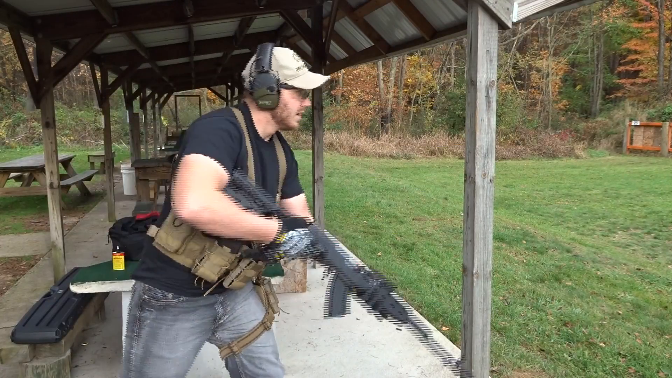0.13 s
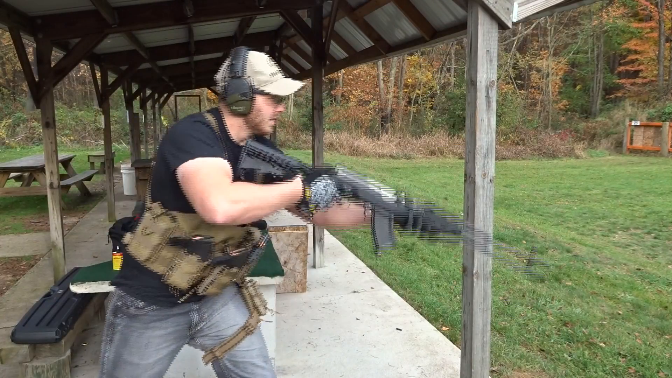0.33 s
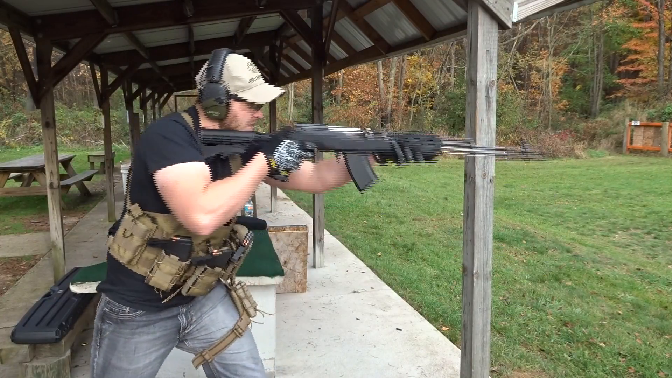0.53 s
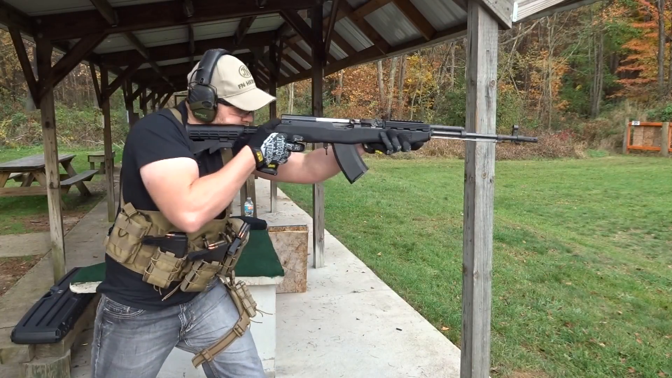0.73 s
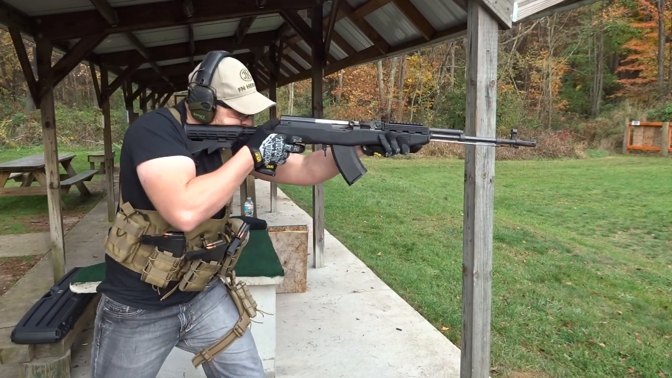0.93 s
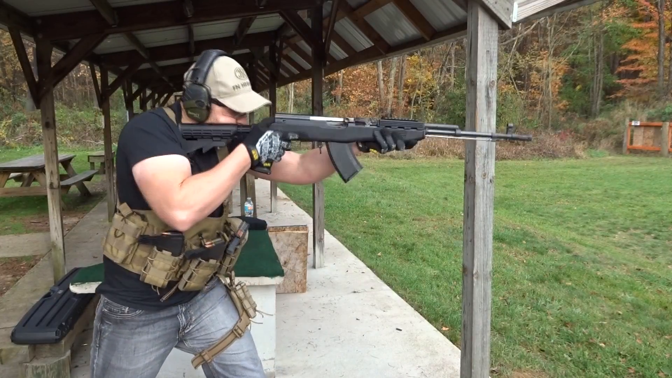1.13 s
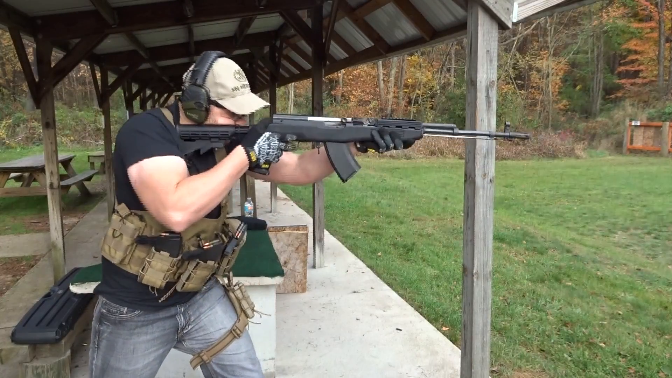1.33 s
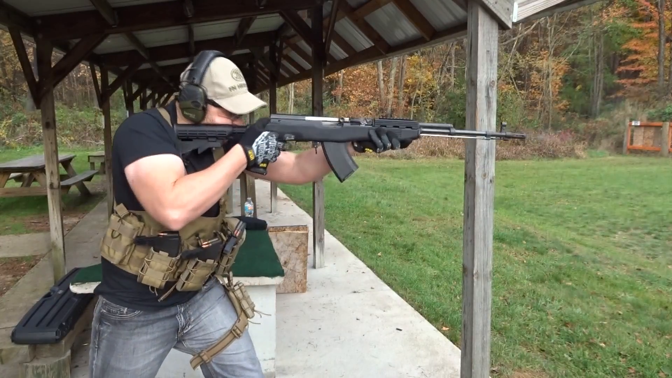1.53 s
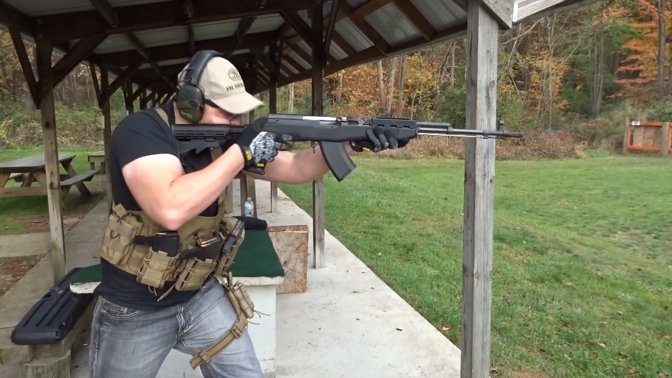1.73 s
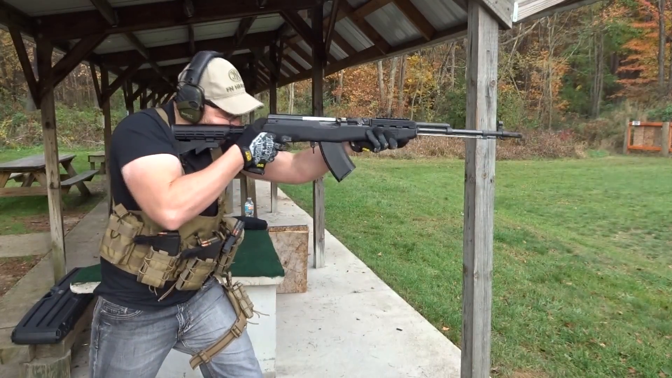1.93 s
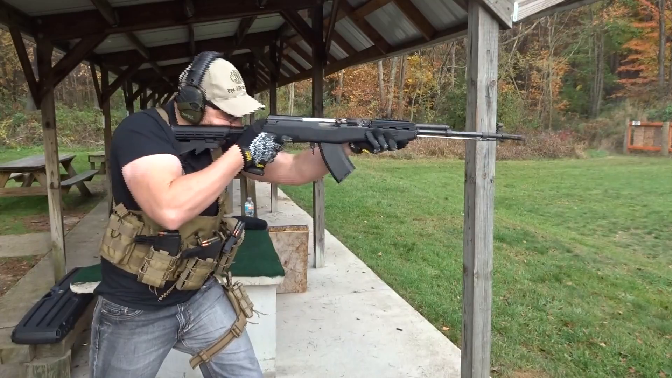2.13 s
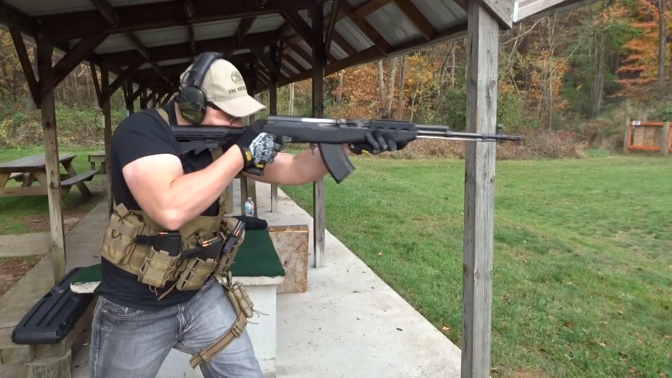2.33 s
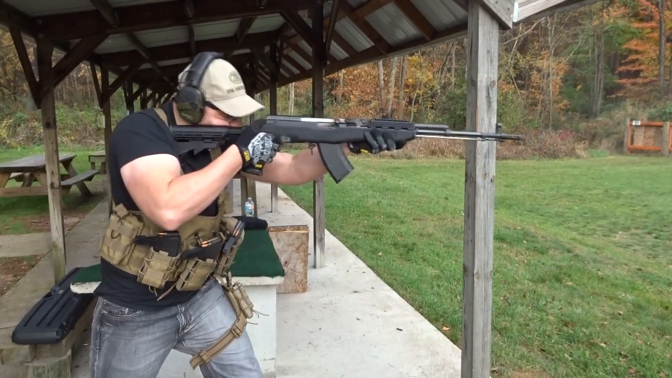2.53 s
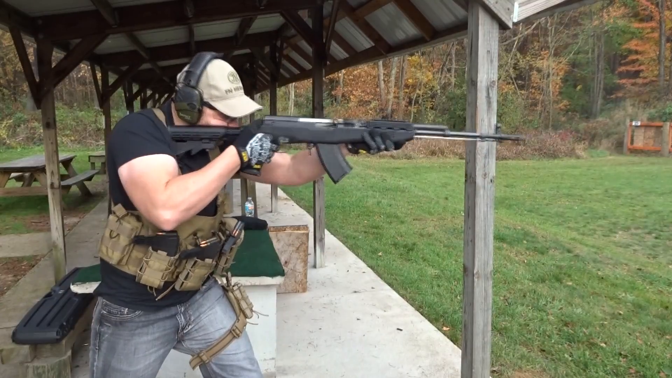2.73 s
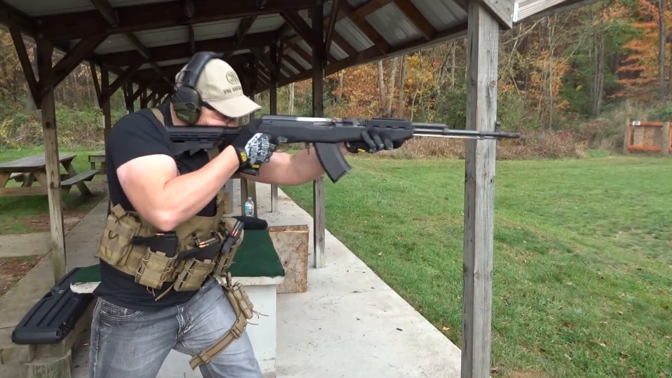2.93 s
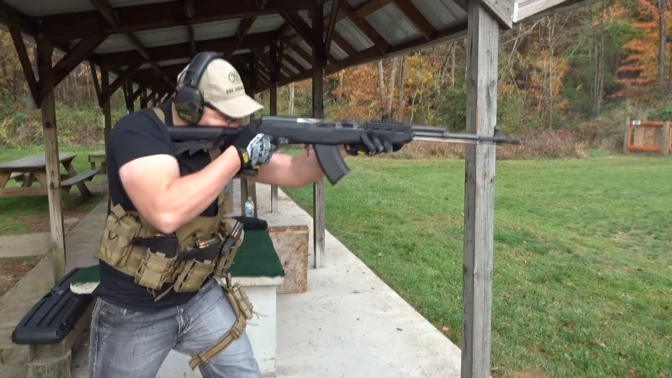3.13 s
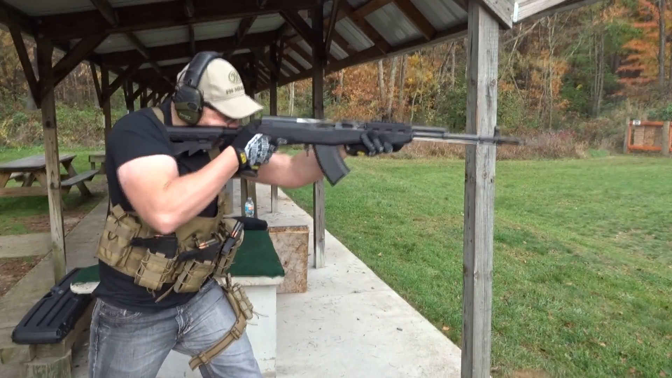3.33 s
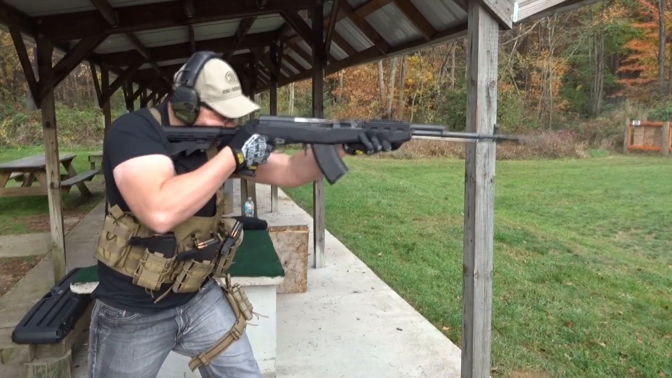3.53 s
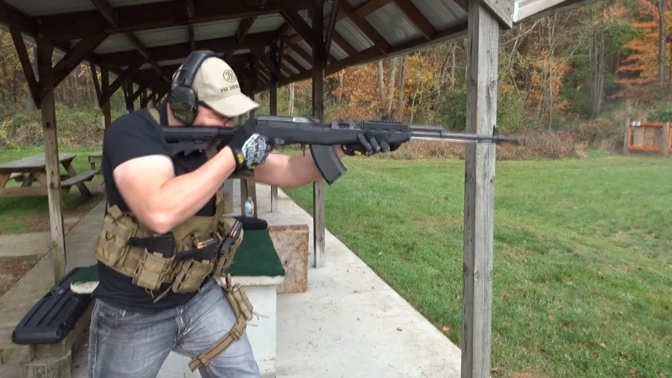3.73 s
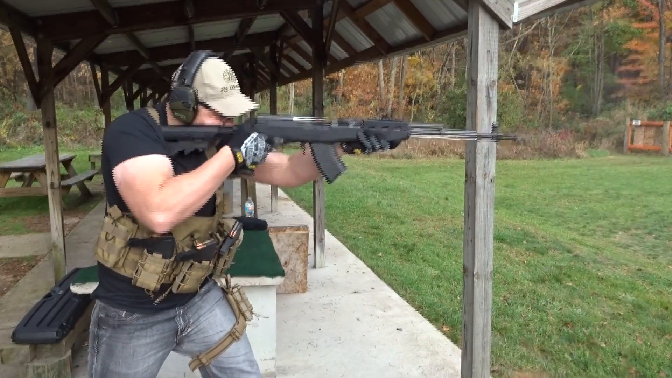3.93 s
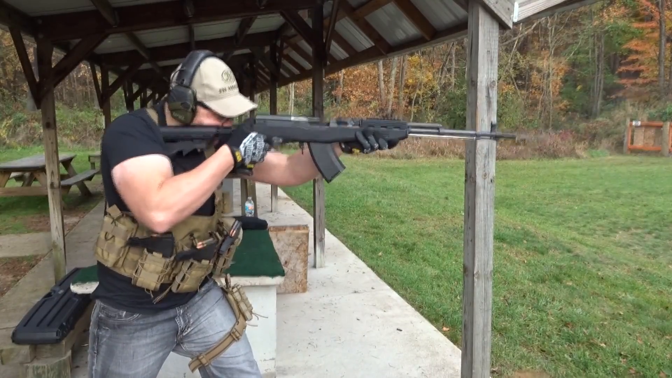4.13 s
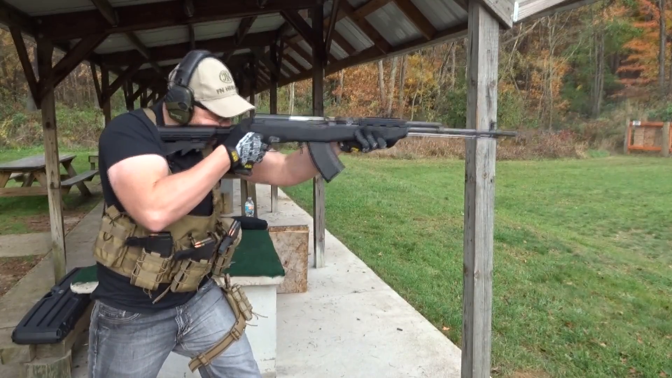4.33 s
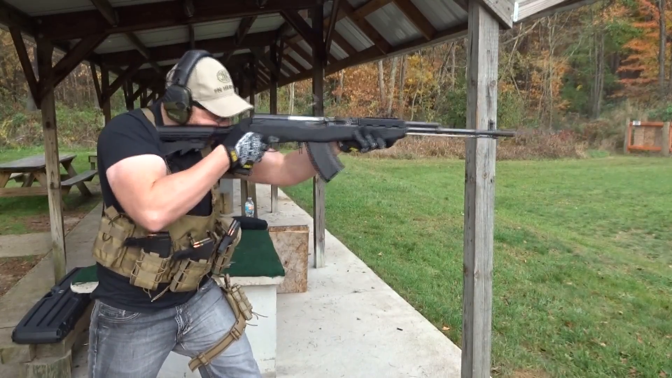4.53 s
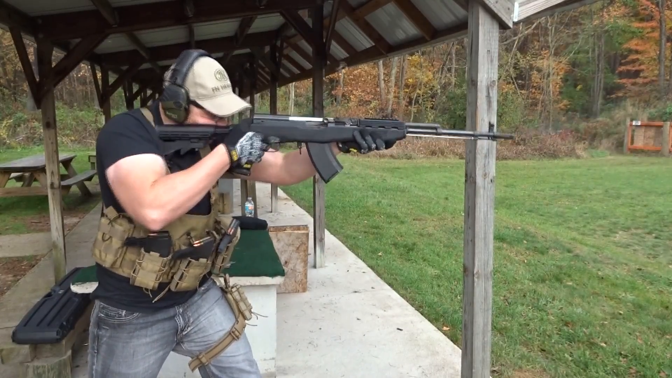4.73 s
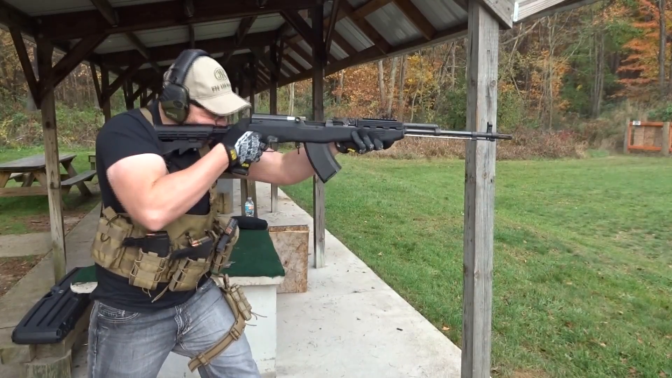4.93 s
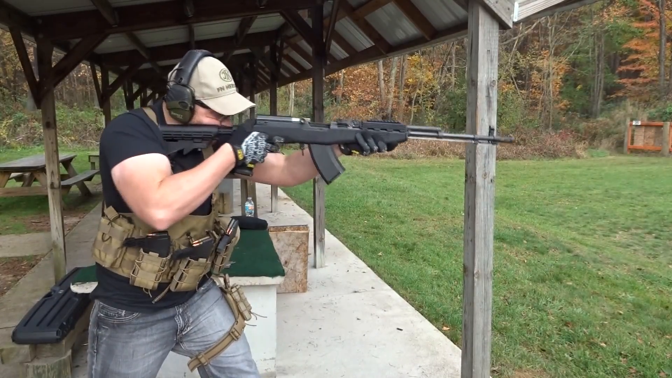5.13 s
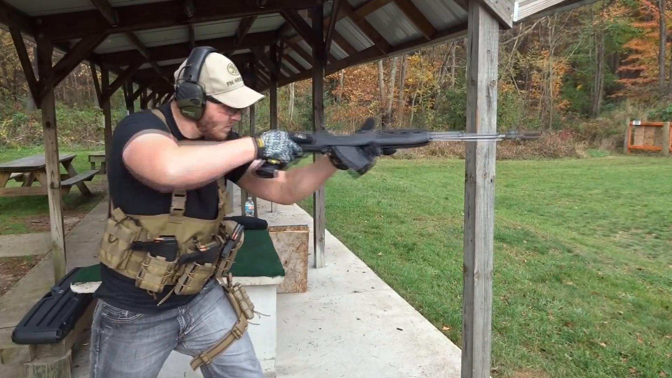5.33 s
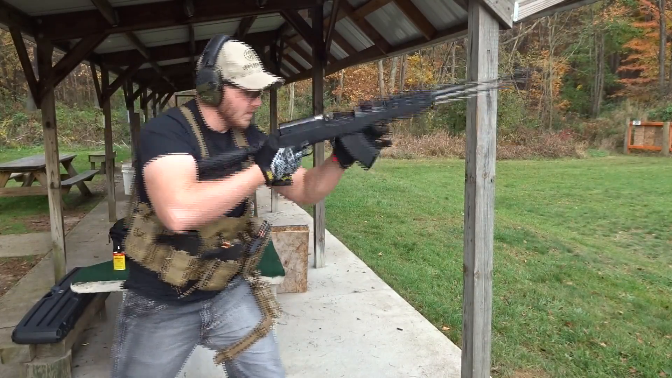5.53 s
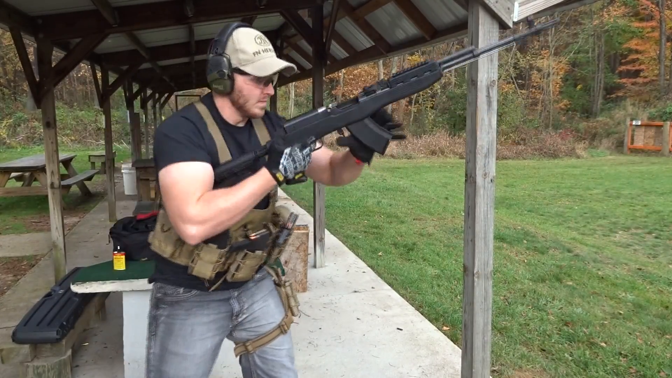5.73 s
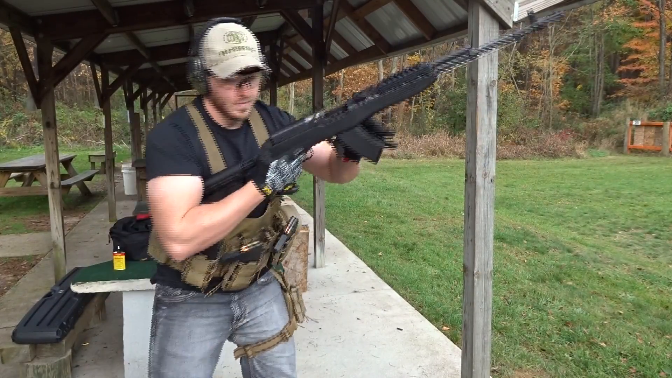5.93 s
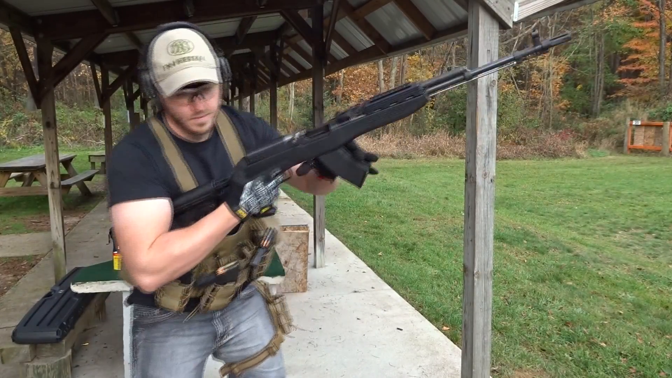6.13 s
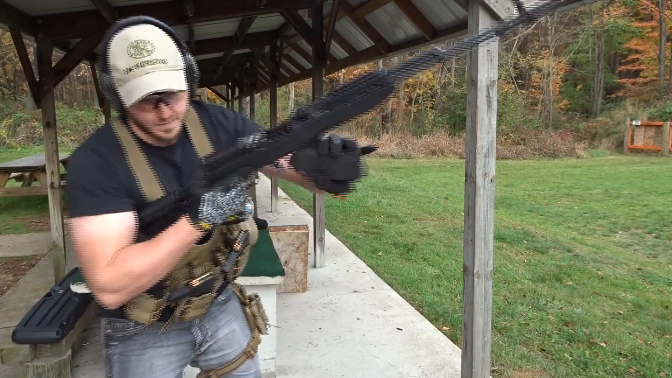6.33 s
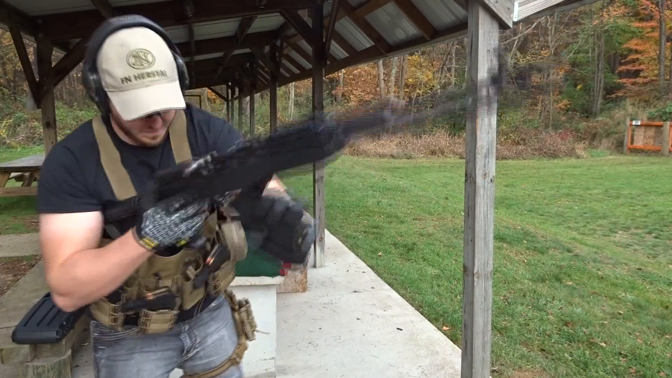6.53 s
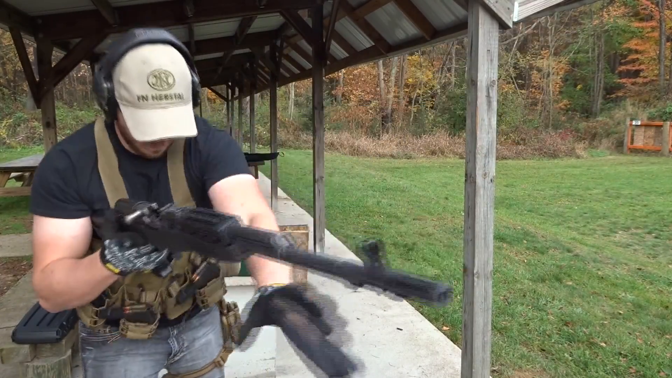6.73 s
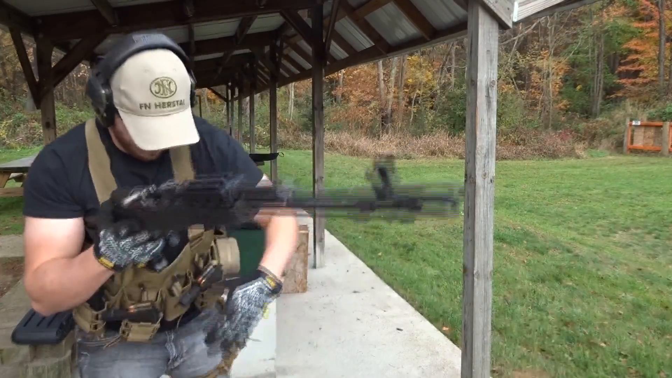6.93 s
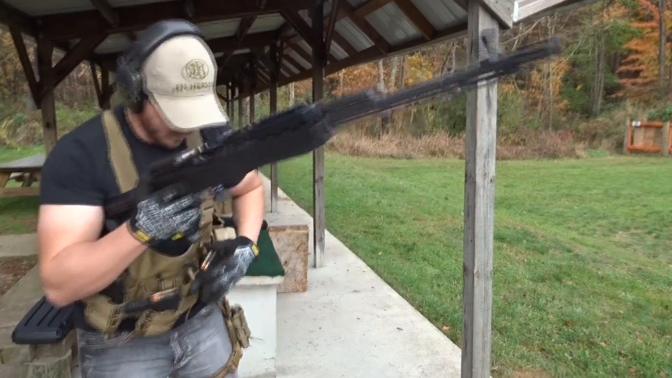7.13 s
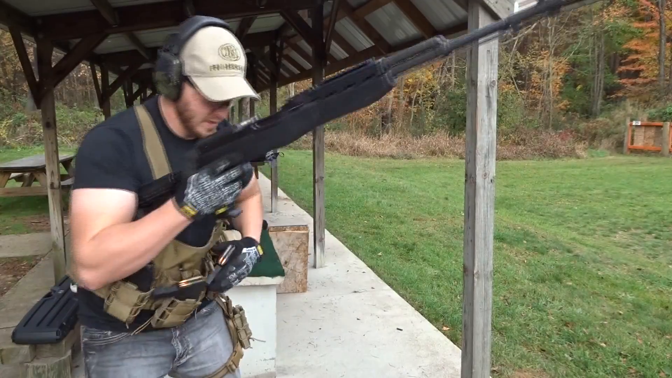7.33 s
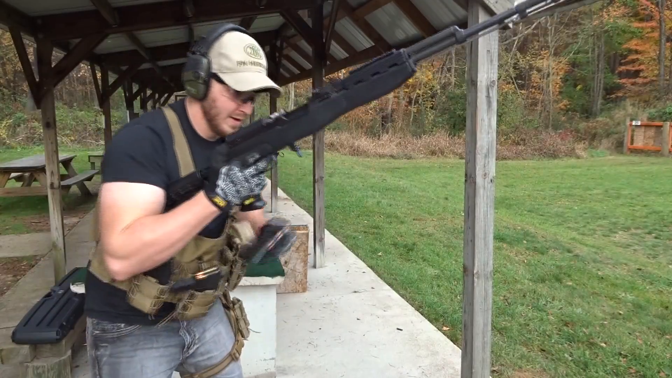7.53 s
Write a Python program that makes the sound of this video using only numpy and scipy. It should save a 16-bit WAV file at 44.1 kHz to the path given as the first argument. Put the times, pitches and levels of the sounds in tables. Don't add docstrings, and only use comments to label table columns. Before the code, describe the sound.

Close stereo camera sound under an open tin-roofed shed beside a field. Straps rustle and steel clicks, then a rifle fires twenty loud shots, about five a second, each rattling between roof and slab. Trees answer with a wash and a far slope with a dull rumble. Bolt clacks and thin brass rings show between blasts. Echoes fade, then a hollow magazine knocks and bounces on the floor.

```python
import sys
import numpy as np
from scipy import signal
from scipy.fft import rfft, irfft, next_fast_len
from scipy.io import wavfile
from scipy.ndimage import uniform_filter1d, map_coordinates

SR = 44100
rng = np.random.default_rng(int(sys.argv[2]) if len(sys.argv) > 2 else 0)


def level_to_linear(level):
    exponent = np.asarray(level, float) / 20
    return 10 ** exponent


def persist_wave(psi):
    counts = np.round(np.clip(psi, -1, 1) * 32767).astype(np.int16)
    wavfile.write(sys.argv[1], SR, np.atleast_2d(counts).T)


N = 339129


def unit(x):
    return x / np.sqrt(np.mean(x ** 2) + 1e-20)


def along(points, hz):
    f, v = np.transpose(points)
    return np.interp(np.log(hz + 1), np.log(f + 1), v)


def curve(rows):
    return np.interp(np.arange(N) / SR, *np.transpose(rows))


def wobble(rate, size=N):
    knots = rng.standard_normal(int(size * rate / SR) + 4)
    return map_coordinates(knots, [np.arange(size) * rate / SR])


def stereo(pair, spectrum, alike):
    size = pair.shape[-1]
    hz = np.fft.rfftfreq(size, 1 / SR)
    turn = np.arccos(np.clip(along(alike, hz), -1, 1)) / 2
    both = irfft(rfft(pair) * level_to_linear(along(spectrum, hz)) * [np.cos(turn), np.sin(turn)], size)
    middle, side = both[..., :1, :], both[..., 1:, :]
    return unit(middle + side * [[1], [-1]])


# pitch in Hz, share from 0 to 1.
SAME_EACH_SHOT = [(300, .95), (1500, .8), (5000, .45), (11000, .1)]


def echoes(length, t60, hold, spectrum, alike, count):
    size = next_fast_len(int(length * SR))
    noise = rng.standard_normal((count + 1, 2, size), np.float32)
    hz, t, z = signal.stft(noise, SR, nperseg=256)
    same = along(SAME_EACH_SHOT, hz)[:, None]
    z = np.sqrt(same) * z[:1] + np.sqrt(1 - same) * z[1:]
    z = z * level_to_linear(-60 * np.maximum(t - hold, 0) / along(t60, hz)[:, None])
    noise = signal.istft(z, SR, nperseg=256)[1][..., :size]
    last_quarter_fade = np.minimum(1, np.arange(size)[::-1] / size * 4)
    return stereo(noise, spectrum, alike) * last_quarter_fade


def placed(sounds, times):
    out = np.zeros((2, N + SR))
    for sound, s in zip(sounds, times):
        room = out[:, max(round(s * SR), 0):][:, :sound.shape[-1]]
        room += sound[:, :room.shape[-1]]
    return out[:, :N]


# start in seconds, peak level in dB.
SHOTS = [(0.9145, -9.5), (1.1447, -7), (1.3445, -7), (1.5404, -7), (1.7373, -7), (1.9504, -6.5),
         (2.161, -6.5), (2.358, -6.5), (2.5611, -6), (2.7601, -6), (2.986, -6), (3.1855, -6), (3.3786, -6),
         (3.5911, -6), (3.787, -6), (3.9903, -6), (4.174, -5.5), (4.366, -6), (4.545, -6), (4.733, -6)]
# pitch in Hz, level in dB per Hz.
BLAST_COLOUR = [(18, -52.5), (30, -26.5), (134, -14.5), (210, -8), (374, -9), (473, -4.5), (822, -7),
                (1070, -9), (2230, -10.5), (3980, -16), (12000, -20), (14800, -21), (16000, -38)]
# pitch in Hz, seconds to fall by 60 dB.
ROOF_T60 = [(100, 0.31), (500, 0.24), (2000, 0.25), (5000, 0.4), (11000, 0.26)]
# pitch in Hz, likeness from 0 to 1.
BLAST_ALIKE = [(60, 0.94), (180, 1), (550, 0.92), (1650, 0.86), (4970, 0.95), (15000, 0.95)]
# arrival in seconds, pitch in Hz, half length in seconds, level in dB.
ROOF_NOTES = [(0.01, 829.3, .007, -1), (.01, 661.5, .008, -5), (0.018, 234.2, 0.01, -6),
              (.03, 489.7, 0.0057, 4), (0.052, 521.7, .012, -5.5), (.035, 801.3, .008, -6),
              (0.049, 618.6, 0.012, -7.5), (0.06, 160, .02, -10), (.065, 1120, 0.0081, -8),
              (0.073, 680, .008, -6.5), (0.075, 287, 0.02, -11)]


def roof_notes(t, count):
    each_shot = (count, 1, 1)
    notes = 0
    for at, hz, span, level in ROOF_NOTES:
        loudness = level_to_linear(level + rng.normal(0, 1.8, each_shot))
        pitch = hz * (1 + rng.normal(0, .012, each_shot))
        phase = 6 * rng.random((2, 1)) * [[1], [.1]]
        swell = np.exp(-((t - at) / span) ** 2)
        notes = notes + loudness * np.sin(2 * np.pi * pitch * t + phase) * swell
    notes = notes[:, :1] + level_to_linear(-12) * notes[:, 1:] * [[1], [-1]]
    return notes * level_to_linear(rng.normal(0, .81, each_shot))


def blast():
    s, db = np.transpose(SHOTS)
    near = echoes(.3, ROOF_T60, .039, BLAST_COLOUR, BLAST_ALIKE, count=len(s))
    t = np.arange(near.shape[-1]) / SR
    low = uniform_filter1d(near, size=15)
    crack = (near - low) * (1 - np.exp(-t / .0008)) * (1 + .5 * np.exp(-t / .004))
    body = level_to_linear(-1) * low * (1 - np.exp(-(t / .0042) ** 2))
    near = (crack + body) * level_to_linear(1.3 * wobble(250, size=len(t)) + 1.34 - 19 * t)
    boom = np.sin(2 * np.pi * 105 * t) * np.exp(-t / .017)
    hollow = level_to_linear(4) * roof_notes(t, len(s)) + level_to_linear(-6) * boom
    near = near + hollow * (1 - np.exp(-(t / .004) ** 2))
    return placed(near * level_to_linear(db - db.mean() - 18)[:, None, None], s - .0005)


# pitch in Hz, level in dB per Hz.
TREES_COLOUR = [(18, -56.5), (30, -32), (98, -13.5), (355, -4), (426, -2.5), (684, -1.5), (1540, -9),
                (2750, -9), (7270, -17), (14000, -27.5), (16000, -42.5)]
# pitch in Hz, seconds to fall by 60 dB.
TREES_T60 = [(60, 1.7), (200, 1.6), (600, 2.3), (2000, 1.85), (5000, 1.12), (9000, 0.83), (14000, .7)]
# pitch in Hz, likeness from 0 to 1.
ECHO_ALIKE = [(60, 0.93), (180, 1.0), (550, 0.97), (1650, 0.87), (4970, 0.85), (15000, 0.88)]


def trees():
    wash = echoes(1.5, TREES_T60, .12, TREES_COLOUR, ECHO_ALIKE, count=3)
    t = np.arange(wash.shape[-1]) / SR
    wash = level_to_linear(-21) * wash * (1 - np.exp(-(t / .083) ** 2))
    in_turn = [wash[k % len(wash)] for k in range(len(SHOTS))]
    return placed(in_turn, np.transpose(SHOTS)[0])


# pitch in Hz, level in dB per Hz.
SLOPE_COLOUR = [(71, -70), (120, -39.5), (156, -22), (320, -21), (480, -1), (760, 0), (1000, -19),
                (2290, -35.5), (4000, -57.5), (8800, -120)]


def slope():
    t = np.arange(4 * SR) / SR
    lumps = level_to_linear(2.2 * wobble(60, size=len(t)) + 1.8 * wobble(6.8, size=len(t)))
    roll = stereo(lumps * rng.standard_normal((2, len(t))), SLOPE_COLOUR, ECHO_ALIKE)
    roll = roll * level_to_linear(-27.5 - 60 * t / 6.53) * (1 - np.exp(-t / .18))
    return placed([roll] * len(SHOTS), np.transpose(SHOTS)[0])


def bolt():
    delay_s, scatter_s, level_db, ring_hz, t60_s = .093, .002, -24, 5600, .028
    rows = []
    for s, _ in SHOTS:
        late, loud, high = rng.standard_normal(3)
        rows.append((s + delay_s + scatter_s * late, level_db + 2.5 * loud, ring_hz * 2 ** (.2 * high), t60_s, 0))
    return rows


# start in seconds, peak level in dB, main ring in Hz.
CLICKS = [(0.0014, -37.5, 5700), (0.0653, -46, 9470), (0.3925, -33, 3660), (.393, -37, 10800),
          (0.4688, -40, 3230), (0.5077, -40, 5500), (0.631, -51, 5510), (0.8694, -40, 2640),
          (0.8805, -36, 10200), (6.1314, -68, 3270), (6.1564, -59, 3270), (6.1973, -39, 3400),
          (6.199, -41, 8000), (6.4273, -57, 3600), (6.4794, -55.5, 1500), (6.5144, -66, 2500),
          (6.7645, -28, 5730), (6.7751, -34, 9120), (6.7925, -33, 5200), (6.8384, -40, 3560),
          (6.9718, -65, 3810), (7.0174, -37.5, 5330), (7.0394, -48, 3570), (7.4265, -44, 12000),
          (7.5537, -41, 4250), (7.564, -41.5, 3260), (7.5777, -49, 6530)]
# start in seconds, first level in dB, ring in Hz,
# loss in dB at each contact, number of contacts.
RATTLES = [
    (6.2194, -49, 3320, 3, 5),
    (6.8134, -41.5, 3580, 8, 3),
    (6.8628, -50, 4000, 1.5, 5),
    (7.0894, -57, 3500, 1, 3),
    (7.4075, -49, 7600, .6, 3),
]


def contacts():
    gap_s, scatter_s, scatter_octaves = .015, .002, .25
    rows = []
    for s, db, hz, loss_db, count in RATTLES:
        for k in range(round(count)):
            start = s + k * gap_s + scatter_s * rng.normal() * (k > 0)
            rows.append((start, db - k * loss_db, hz * 2 ** (scatter_octaves * rng.normal())))
    rows = np.vstack([CLICKS, rows])
    t60_s = np.full(len(rows), .022)
    pan_db = 1.5 * rng.standard_normal(len(rows))
    return np.column_stack([rows, t60_s, pan_db])


# start in seconds, peak level in dB, main ring in Hz,
# seconds to fall by 60 dB, left-right difference in dB.
TICKS = [
    (4.234, -24, 5600, .03, 0),
    (5.196, -45, 11000, .04, 0),
    (5.222, -61, 11010, .02, 2),
    (5.265, -55, 12000, .05, 0),
    (5.418, -57, 6000, .04, 0),
    (5.535, -61, 5500, .02, -1.5),
    (5.554, -58, 12400, .04, -3),
    (5.6, -60, 8000, .02, 0),
    (5.678, -58, 7000, .025, 0),
]
# start in seconds,
# peak level in dB, main ring in Hz, seconds to fall by 60 dB, left-right difference in dB.
HAMMER = [
    (.892, -42, 2600, 0.036, 0.011),
    (.907, -25, 7500, 0.042, 0),
    (.906, -27, 820, .05, 0),
    (.906, -33, 2200, .04, 0),
    (6.753, -39.5, 3000, .03, -1),
    (7.002, -35, 2400, .025, 0),
    (7.003, -40, 1200, .03, 0),
]
# start in seconds, level in dB.
PINGS = [
    (1.203, -24),
    (2.012, -31),
    (2.815, -29),
    (3.44, -31),
    (4.05, -32),
]


def clicks():
    t = np.arange(SR // 10) / SR
    table = np.vstack([contacts(), TICKS, HAMMER, bolt()])
    out = []
    for s, db, hz, t60, pan_db in table:
        crack = signal.lfilter([1, -.6], [1], rng.standard_normal(len(t)))
        band = signal.lfilter(*signal.iirpeak(hz, 5.5, fs=SR), crack)
        tick = 1.3 * band + .22 * (hz / 6000) ** 1.3 * crack
        tick = tick * level_to_linear(-60 * t / t60) * (1 - np.exp(-t / .0004))
        tick = tick / np.abs(tick).max()
        out.append(level_to_linear(db + 1 + pan_db * np.array([[.5], [-.5]])) * tick)
    ping_hz, ping_t60_s = 12650, .15
    ping = np.sin(2 * np.pi * ping_hz * t) * level_to_linear(-60 * t / ping_t60_s) * (1 - np.exp(-t / .003))
    out += [level_to_linear(db) * ping * np.ones((2, 1)) for _, db in PINGS]
    return placed(out, list(table[:, 0] - .0005) + [s for s, _ in PINGS])


# start in seconds, peak level in dB, note in Hz,
# seconds to fall by 60 dB, level of the ground thud in dB.
KNOCKS = [
    (6.753, -19.5, 530, 0.038, -31),
    (6.765, -23.5, 377, 0.067, -20),
    (6.793, -40, 1540, 0.045, -20),
    (6.845, -29, 415, 0.057, -11),
    (6.865, -37.5, 240, .08, -14),
    (7.003, -27.5, 246, .15, -9.5),
]


def magazine():
    t = np.arange(SR // 2) / SR
    out = []
    for s, db, hz, t60, thud_db in KNOCKS:
        sagging_t = (.9 * t + .1 * .02 * (1 - np.exp(-t / .02))) / .97
        note = np.sin(2 * np.pi * hz * sagging_t)
        note = note + .33 * np.sin(2 * np.pi * .626 * hz * t)
        puff = uniform_filter1d(rng.standard_normal(len(t)), size=14)
        puff = .67 * (puff - uniform_filter1d(puff, size=300))
        knock = (note + puff) * level_to_linear(-60 * t / t60) * (1 - np.exp(-t / .0007))
        thump = level_to_linear(-60 * (t / .13) ** 2)
        rough_tail = wobble(70, size=len(t)) * level_to_linear(-17 - 60 * t / .6)
        thud = np.sin(2 * np.pi * 98 * t) * (thump + rough_tail)
        thud = thud * level_to_linear(thud_db + 3 * wobble(35, size=len(t))) * (1 - np.exp(-t / .01))
        shed = uniform_filter1d(rng.standard_normal((2, len(t))), size=60)
        shed = shed - uniform_filter1d(shed, size=400)
        shed = shed * level_to_linear(-1.5 - 60 * t / .3) * (1 - np.exp(-t / .006))
        out.append(level_to_linear(db) * (knock + thud + shed))
    return placed(out, np.transpose(KNOCKS)[0])


# pitch in Hz, level in dB per Hz.
CLOTH_COLOUR = [(710, -32.5), (1200, -4), (3830, -2.5), (5710, -6), (12300, -10), (15200, -14),
                (16000, -30.5)]
# time of the peak in seconds, peak level in dB,
# seconds to swell by 20 dB, seconds to fade by 20 dB.
RUBS = [(0, -51, .05, 0.1), (.125, -48, .07, .08), (.13, -56, .3, .45), (.37, -55, .2, .25),
        (.8, -71, .4, .3), (6.2, -61, .015, .13), (6.4, -84, .4, .5), (6.76, -51.5, .01, .12),
        (7.01, -59, .01, .1), (7.13, -64, .1, .17), (7.35, -69, .06, .25), (7.43, -65, .04, .08),
        (7.56, -68, .01, .12), (7.66, -84, .2, .3)]


def rustle():
    t = np.arange(N) / SR
    rubs = [db - 20 * np.maximum((t - s) / fade, (s - t) / swell) for s, db, swell, fade in RUBS]
    level = level_to_linear(np.max(rubs, axis=0))
    grain = level_to_linear(1.3 * wobble(90) + 2.3 * wobble(500))
    return level * stereo(grain * rng.standard_normal((2, N)), CLOTH_COLOUR, [(1000, .68)])


# pitch in Hz, level in dB per Hz.
AIR_COLOUR = [(15, -36), (25, -8.5), (64, -3.5), (373, -11.5), (531, -6.5), (1000, -12), (1350, -29),
              (1740, -28), (2110, -44), (2840, -43.5), (13600, -39.5), (16000, -49.5)]
# pitch in Hz, likeness from 0 to 1.
AIR_ALIKE = [(60, 1), (240, 0.88), (950, 0.91), (3770, 0.34), (15000, 0.92)]


def air():
    return level_to_linear(-45.5 + 1.5 * wobble(4.1)) * stereo(rng.standard_normal((2, N)), AIR_COLOUR, AIR_ALIKE)


# time in seconds, gain in dB.
CAMERA_GAIN = [(0, 0), (.95, 0), (1.4, -1.5), (1.9, -3.5), (2.4, -6), (2.9, -9), (3.5, -10), (4.2, -9.5),
               (4.8, -9.5), (5.5, -15.5), (6.5, -16.5), (7.7, -12.5)]


def scene():
    gain_db = curve(CAMERA_GAIN)
    duck = np.zeros(N)
    for s, _ in SHOTS:
        duck[round((s - .003) * SR):round((s + .04) * SR)] = 1
    duck_db = uniform_filter1d(duck, size=150) * (-9 - .7 * gain_db)
    answers = (trees() + slope()) * level_to_linear([[-.6], [.6]])
    far = answers + level_to_linear(1.6 * gain_db) * air()
    return blast() + level_to_linear(gain_db + duck_db) * far + rustle() + clicks() + magazine()


# sudden onset in seconds, length of the gap just ahead of
# it in seconds, pitch in Hz above which sound nearly vanishes.
DROPOUTS = [
    (1.7373, .013, 10500),
    (2.7601, .008, 9000),
    (2.986, .008, 7500),
    (3.1856, .006, 9000),
    (3.3787, .012, 8000),
    (3.5911, .015, 8000),
    (3.9903, .009, 6000),
    (4.733, .006, 9000),
    (7.001, .012, 1800),
    (7.552, .008, 2000),
]


def starved(x):
    out = x.copy()
    for s, length, edge_hz in DROPOUTS:
        start, end = round((s - .001 - length) * SR), round((s - .001) * SR)
        size = end - start
        part = x[:, start:end] * signal.windows.tukey(size, .3)
        treble = irfft(rfft(part) * (np.fft.rfftfreq(size, 1 / SR) > edge_hz), size)
        out[:, start:end] -= .95 * treble
    return out


def band_limit(x):
    return signal.sosfilt(signal.butter(12, 16630, fs=SR, output="sos"), x)


def record(dry):
    top, knee, edge_hz = .97, 4.5, 15500
    wet = dry / (1 + np.abs(dry / top) ** knee) ** (1 / knee)
    hz, _, z = signal.stft(wet, SR, nperseg=1024)
    power = np.mean(np.abs(z) ** 2, 0)
    total = power.mean(0)
    faint = uniform_filter1d(power, size=6, axis=0) < level_to_linear(-46) * total
    masked = faint & (hz[:, None] > 7500) & (total > level_to_linear(-150))
    edge_db = -30 * np.clip((hz - edge_hz) / 400 + .5, 0, 1)[:, None]
    wet = signal.istft(z * level_to_linear(edge_db - 14 * masked), SR, nperseg=1024)[1][:, :N]
    return band_limit(starved(wet))


dry = scene()
out = record(dry)
persist_wave(out)
```